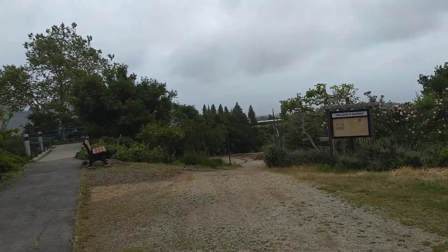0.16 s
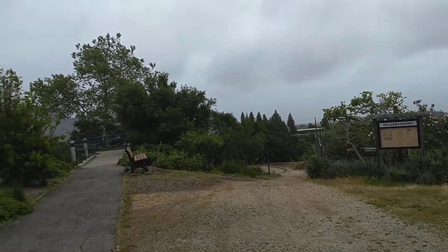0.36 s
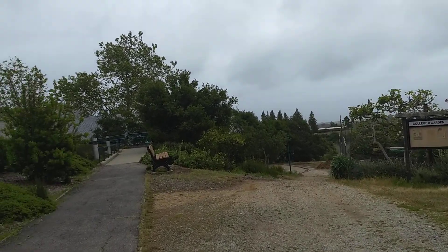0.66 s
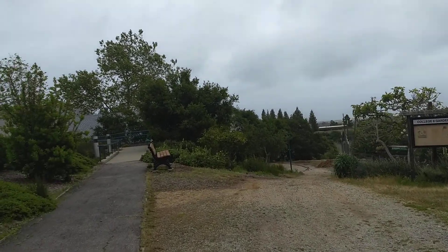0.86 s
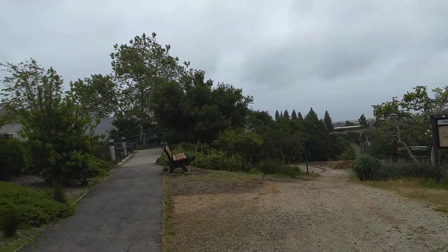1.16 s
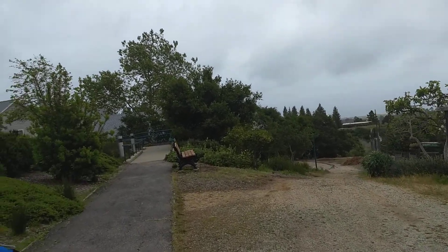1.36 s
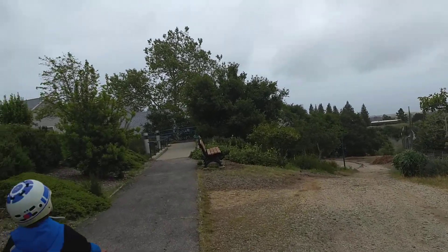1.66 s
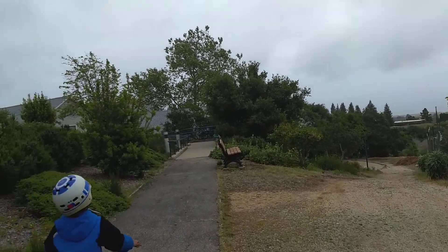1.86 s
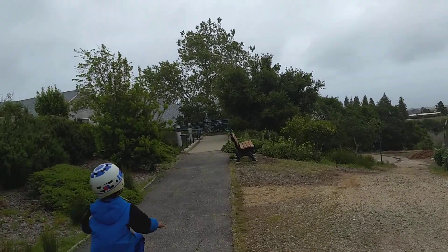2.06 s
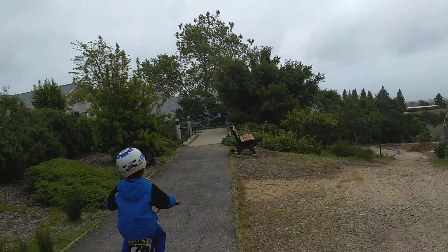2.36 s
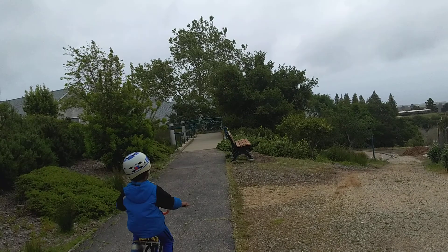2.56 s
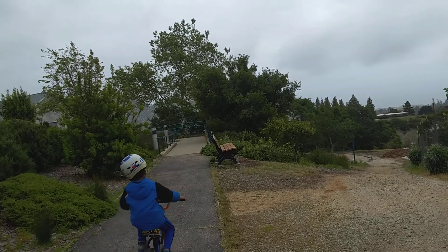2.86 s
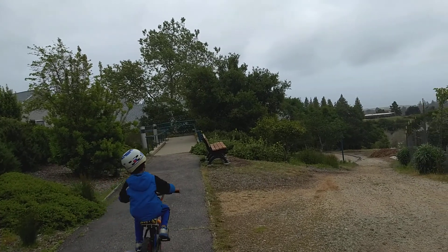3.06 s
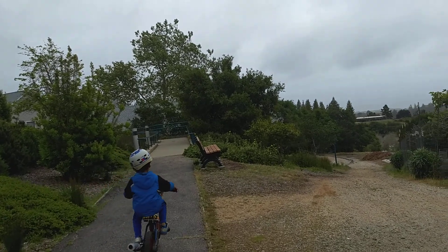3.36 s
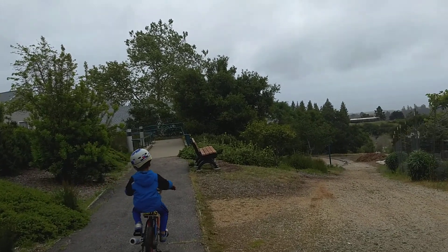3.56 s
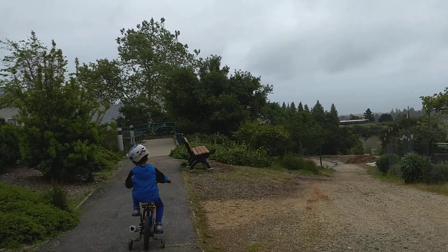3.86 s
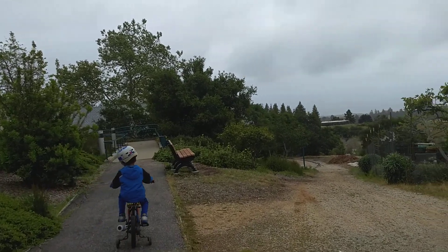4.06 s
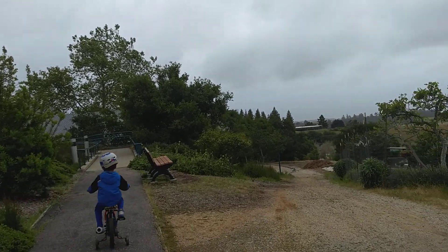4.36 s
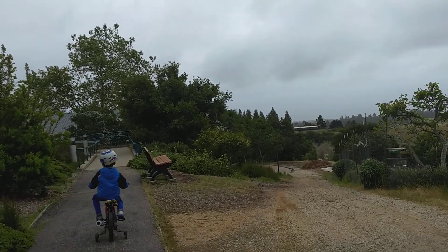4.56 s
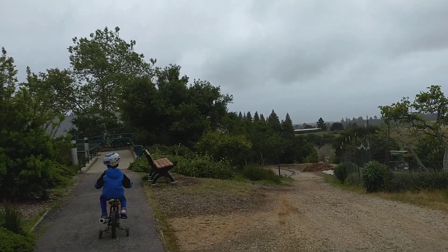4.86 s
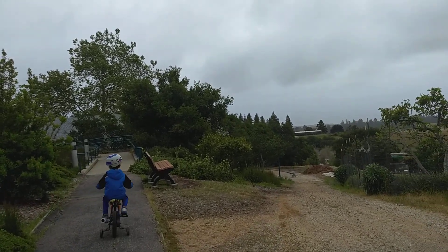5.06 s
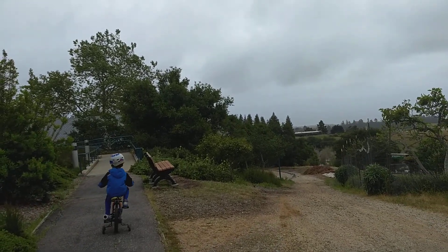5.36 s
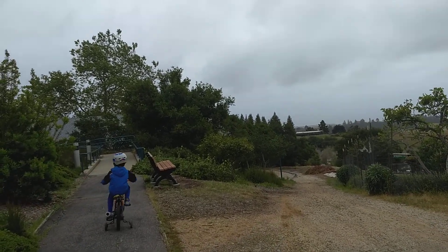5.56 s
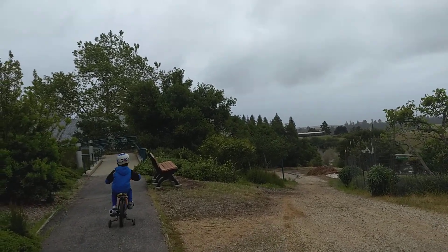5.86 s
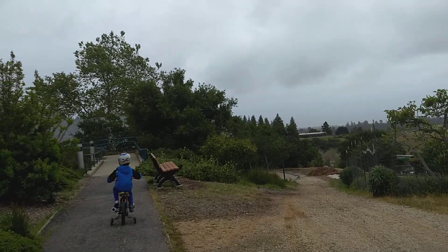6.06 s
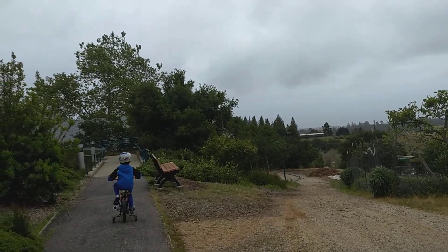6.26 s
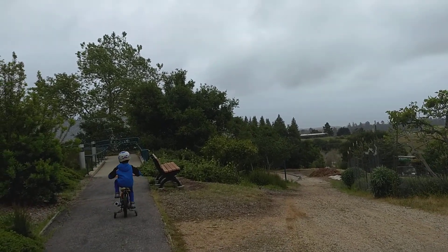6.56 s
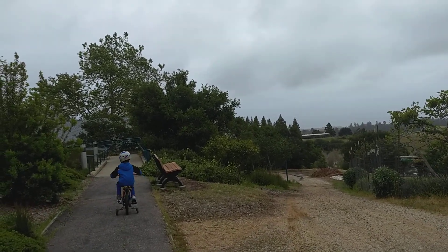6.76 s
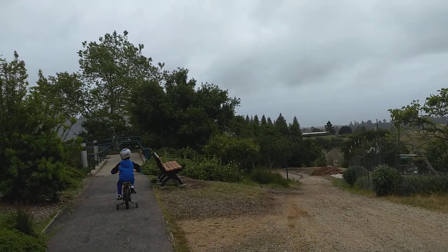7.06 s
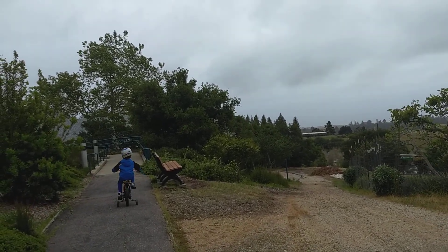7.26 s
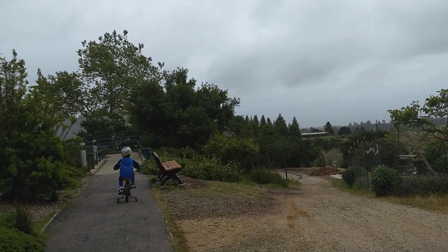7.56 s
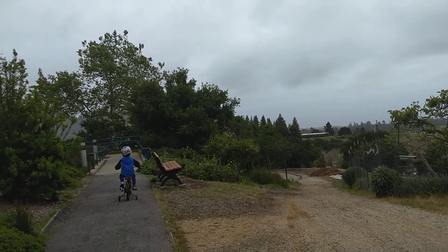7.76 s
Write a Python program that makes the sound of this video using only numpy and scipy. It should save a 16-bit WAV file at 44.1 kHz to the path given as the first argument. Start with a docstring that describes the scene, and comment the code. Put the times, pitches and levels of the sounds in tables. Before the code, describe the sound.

Hard plastic wheels rumble and scrape on gritty pavement beside the listener, chain clicking irregularly, fading forward while wind thumps the microphones.

```python
"""A child's bicycle with training wheels rolls along gritty asphalt, level with the microphones, then away ahead.
Its hard wheels roar, crunch and scuff: shaped noise whose power follows random grains of grit.
Freewheel, chain and frame tick and rattle in short noise bursts; knocks ring the hollow training wheels.
Wind buffets the two close microphones as gusty filtered noise.
Behind lies open air: soft noise, a faint drone and a far two-tone hum."""
import sys
import numpy as np
from scipy import signal
from scipy.fft import rfft, irfft, next_fast_len
from scipy.io import wavfile
from scipy.ndimage import uniform_filter1d

SR = 44100
rng = np.random.default_rng(int(sys.argv[2]) if len(sys.argv) > 2 else 0)


def wav_record(signal):
    """Record a signal, one row per channel, as 16-bit PCM in the file named by sys.argv[1]."""
    frames = np.transpose(np.atleast_2d(signal))
    bounded = np.clip(frames, -1, 1)
    # unit amplitude maps onto the largest positive 16-bit level
    quanta = np.round(bounded * 32767).astype(np.int16)
    wavfile.write(sys.argv[1], SR, quanta)


N = 348390
TIME = np.arange(N) / SR
SIZE = next_fast_len(N + 8192)  # room for filter tails
FREQS = np.maximum(np.arange(SIZE // 2 + 1) * SR / SIZE, 1)


def from_db(db):
    """Decibels to gain."""
    return 10 ** (np.asarray(db) / 20)


def rms_one(x):
    """Scale to unit rms."""
    return x / np.sqrt(np.mean(x ** 2) + 1e-20)


def in_time(rows):
    """The columns of a curve at every sample."""
    s, *columns = np.transpose(rows)
    return [np.interp(TIME, s, c) for c in columns]


def in_freq(rows):
    """The columns of a spectrum at every frequency, interpolated over log frequency."""
    hz, *columns = np.transpose(rows)
    return [np.interp(np.log(FREQS), np.log(hz), c) for c in columns]


def coloured(x, spectrum):
    """Give a white signal a spectrum and keep its power; minimum phase, so nothing sounds early."""
    gain = rms_one(from_db(in_freq(spectrum)[0]))
    cepstrum = irfft(np.log(gain), SIZE)
    cepstrum[1:SIZE // 2] *= 2
    cepstrum[SIZE // 2 + 1:] = 0
    response = np.exp(rfft(cepstrum))
    return irfft(rfft(x, SIZE) * response, SIZE)[..., :N]


def noise():
    """White noise."""
    return rng.standard_normal(N)


def two_paths():
    """Unrelated white noise for the direct and the scattered path."""
    return rng.standard_normal((2, N))


def drift(rate):
    """Slow chance with about this many turns a second; unit rms."""
    size = SIZE // 16  # a coarse time grid is enough
    hz = np.arange(size // 2 + 1) * SR / SIZE
    slow = irfft(rfft(rng.standard_normal(size)) / (1 + (hz / rate) ** 2), size)
    return rms_one(np.interp(TIME, np.arange(size) / size * SIZE / SR, slow))


def evened(x, seconds):
    """Unit level over stretches of this length; faster detail stays."""
    power = uniform_filter1d(x ** 2, max(int(seconds * SR), 2))
    return x / np.sqrt(np.abs(power) + 1e-12)


def resonance(curve, width_hz):
    """A randomly driven resonance that follows a curve of level and pitch."""
    level_db, hz = in_time(curve)
    phase = 2 * np.pi * np.cumsum(hz) / SR
    ring = drift(width_hz) * np.cos(phase) + drift(width_hz) * np.sin(phase)
    return from_db(level_db) * rms_one(ring)


def grains(per_s, spread_db, t60):
    """Power of small random contacts: uneven sizes, sudden starts, quick decays; mean near 1."""
    happens = rng.random(N) < per_s / SR
    sizes = from_db(spread_db * np.minimum(rng.exponential(1, N), 3)) * happens
    power = signal.lfilter([1], [1, -from_db(-120 / (t60 * SR))], sizes ** 2 + 1e-9)
    return evened(np.sqrt(power), seconds=0.097) ** 2


# open-air noise around the microphones: (frequency [Hz], relative level [dB per Hz])
AIR_SPECTRUM = [(30, -1), (80, 11), (250, 19.5), (480, -4), (650, -4), (850, -12), (1000, 12.5), (1200, 7),
                (1900, -6), (2450, -8), (3050, 8), (3600, 4.5), (6000, -55), (9000, -12), (16000, -18)]
# soft drone: (time [s], level [dB], pitch [Hz])
DRONE = [(0, -45.5, 410), (1, -43, 417.5), (2.5, -58, 417.4), (4.1, -46, 416.2), (4.7, -51.5, 424.3),
         (5.5, -54, 408.6), (7.9, -46, 410)]
# far hum: (time [s], level [dB])
HUM = [(0, -44.5), (2.7, -59), (4.3, -49.5), (5.1, -44.5), (6.6, -46.5), (7.9, -44.5)]
# its two narrow tones: (mean frequency [Hz], relative level [dB])
HUM_TONES = [(342, -2.5), (361, -.5)]


def background():
    """Open air as shaped noise, a drone as a driven resonance, a far hum as two wavering sines."""
    hum = 0
    for hz, level_db in HUM_TONES:
        phase = 2 * np.pi * np.cumsum(hz + .8 * drift(9)) / SR
        tone = np.sin(phase) * from_db(0.41 * drift(2.8))
        hum = hum + from_db(level_db) * rms_one(tone)
    air = from_db(-48.5) * coloured(noise(), AIR_SPECTRUM)
    return air + resonance(DRONE, width_hz=14.0) + from_db(in_time(HUM)[0]) * hum


# breeze on the microphones, before its lumps: (time [s], relative level [dB])
BREEZE = [(0, -23.5), (.25, -33.5), (.33, -27), (.6, -23.5), (1.03, -30), (1.15, -40), (1.42, -40.5),
          (1.55, -32), (1.65, -32.5), (1.9, -30), (2.0, -26.5), (2.4, -27.5), (2.7, -30.5), (3.15, -27),
          (3.25, -51), (3.42, -32.5), (3.55, -44), (3.6, -25), (3.75, -41), (3.94, -29), (4.14, -36),
          (4.3, -32), (4.5, -29), (4.7, -40), (5.05, -33.5), (5.3, -34), (5.45, -28), (5.66, -41),
          (5.9, -23), (6.08, -27.5), (6.2, -24), (6.5, -20.5), (6.92, -20), (7.05, -32), (7.45, -34.5),
          (7.66, -26.5), (7.9, -30)]
# single gusts that hit the microphones: (time [s], relative level [dB], half length [s])
PUFFS = [(0.052, -14.5, 0.0037), (0.146, -27, 0.024), (0.52, -13, 0.036), (0.648, -11.5, 0.01),
         (0.739, -13.5, 0.038), (0.887, -14, 0.01), (1.029, -14, 0.0061), (1.515, -22, 0.026),
         (1.841, -22.5, 0.013), (2.176, -10.5, 0.022), (2.264, -11, 0.038), (2.475, -17.5, 0.0042),
         (2.508, -14.5, 0.0064), (2.58, -15, 0.0084), (2.773, -23, 0.015), (2.907, -23, 0.03),
         (2.953, -20.5, 0.0097), (3.047, -21, 0.013), (3.086, -16, 0.0084), (3.144, -17.5, 0.03),
         (3.703, -21.5, 0.025), (3.795, -23.5, 0.013), (3.834, -23.5, 0.025), (3.986, -11.5, 0.018),
         (4.035, -17, 0.03), (4.324, -12.5, 0.0081), (4.443, -19.5, 0.027), (4.495, -19, 0.017),
         (4.544, -23, 0.013), (4.793, -21.5, 0.019), (4.91, -27, 0.0087), (5.09, -26, 0.016),
         (5.297, -24.5, 0.022), (5.344, -25.5, 0.02), (5.538, -15, 0.024), (5.588, -19.5, 0.015),
         (5.718, -14.5, 0.01), (5.753, -20, 0.018), (5.802, -14, 0.0052), (5.999, -22, 0.0062),
         (6.136, -13.5, 0.011), (6.285, -21.5, 0.014), (6.334, -14.5, 0.0099), (6.379, -17.5, 0.0079),
         (6.476, -18, 0.062), (6.562, -19.5, 0.026), (6.719, -13, 0.014), (6.767, -21, 0.0081),
         (6.849, -12.5, 0.01), (6.905, -18, 0.025), (7.12, -24, 0.0093), (7.277, -16, 0.014),
         (7.527, -23, 0.015), (7.697, -24, 0.01), (7.761, -17.5, 0.0079), (7.81, -15.5, 0.014),
         (7.862, -17, 0.026)]
# size of the eddies: (time [s], base weight of quick buffeting against slow rumble [dB])
EDDIES = [(0, 7.5), (.6, -0.5), (1.9, 4), (2.2, 7.5), (2.6, 7), (3.6, -6), (4.3, 1), (5.3, -7.5),
          (6.2, -4.5), (6.5, 1.5), (7.9, 3)]
# slow, quick and quickest turbulence: (frequency [Hz], relative level [dB per Hz])
RUMBLE_SPECTRUM = [(12, -59), (30, -15), (43, -11.5), (65, 4), (100, 3), (150, -2.5), (220, -20),
                   (320, -24), (600, -58.5), (4000, -100)]
BUFFET_SPECTRUM = [(30, -58), (90, -5), (150, 5), (220, -1.5), (300, -11), (500, -23), (800, -42),
                   (2000, -47), (8000, -73)]
FLUTTER_SPECTRUM = [(50, -9), (200, -0.5), (350, -7.5), (550, -17.5), (800, -33.5), (3000, -62)]


def wind(lumpy_db, rumble_db, buffet_db, flutter_db, steepness):
    """Turbulence at the ports; stronger gusts shed smaller eddies: rumble, then buffeting, then flutter."""
    lumps = rms_one(from_db(lumpy_db * drift(30)))
    power = from_db(in_time(BREEZE)[0]) ** 2 * lumps ** 2
    for s, level_db, half_s in PUFFS:
        near = slice(max(int((s - .2) * SR), 0), int((s + .2) * SR))
        power[near] += from_db(level_db) ** 2 * np.exp(-((TIME[near] - s) / half_s) ** 4)
    force = np.sqrt(power)
    # weights against the rumble
    quick = from_db(in_time(EDDIES)[0]) * (force / 0.21) ** steepness
    quickest = from_db(flutter_db) * quick ** 3
    rumble = from_db(rumble_db) * evened(coloured(noise(), RUMBLE_SPECTRUM), seconds=0.035)
    buffet = from_db(buffet_db) * evened(coloured(noise(), BUFFET_SPECTRUM), seconds=0.0312)
    flutter = evened(coloured(noise(), FLUTTER_SPECTRUM), seconds=0.021)
    mixture = rumble + quick * buffet + quickest * flutter
    pressure = force * mixture / np.sqrt(1 + quick ** 2 + quickest ** 2)
    return signal.sosfilt(signal.butter(2, 34, "high", fs=SR, output="sos"), pressure)


def pair(table):
    """Left and right response of the two microphones: a level balance and a phase lead."""
    balance_db, lead = in_freq(table)
    gains = from_db(np.array([balance_db, -balance_db]) / 2)
    gains = gains / np.sqrt(np.mean(gains ** 2, axis=0))
    return gains * np.exp(.5j * np.array([lead, -lead]))


# wind at the pair: (frequency [Hz], left-right balance [dB], left's phase lead [rad])
WIND_PAIR = [(30, -0.57, 2.95), (97, -1.78, 2.875), (213, -1.4, 2.535), (327, -0.64, 1.96), (1020, 1, 1.6)]


def wind_on_pair():
    """Gusts overload the close microphones softly; a little turbulence strikes both in step."""
    gusts = wind(lumpy_db=3.5, rumble_db=1.5, buffet_db=-0.94, flutter_db=-21.5, steepness=0.79)
    gusts = gusts * rms_one(from_db(1.0 * drift(31)))
    gusts = .65 * np.tanh(gusts / .65)
    common = wind(lumpy_db=5.5, rumble_db=-0.5, buffet_db=-1, flutter_db=-14, steepness=0.49)
    return from_db(-21.5) * common + irfft(rfft(gusts, SIZE) * pair(WIND_PAIR), SIZE)[:, :N]


# share of the sound scattered by ground and bushes: (frequency [Hz], share [0-1])
SCATTER = [(250, 0.41), (500, 0.41), (800, 0.1), (1150, 0.01), (1850, 0.22), (2130, 0.01), (2500, 0),
           (3400, 0.89), (4000, 0.21), (4600, 0.06), (5300, 0.44), (6000, 0.03), (7000, 0.28), (9000, 0.13),
           (16000, 0)]


def heard(direct, scattered, table, colour=1):
    """Direct sound enters both channels alike, scattered sound in opposite polarity, then the pair's response."""
    share = np.clip(in_freq(SCATTER)[0], 0, 1) / 2
    both = np.sqrt(1 - share) * rfft(direct, SIZE) + np.sqrt(share) * rfft(scattered, SIZE) * [[1], [-1]]
    return irfft(both * pair(table) * colour, SIZE)[:, :N]


# when the bicycle draws level, how far to the side of the microphones, how fast
PASS_S, PASS_M, SPEED_M_PER_S = 0.63, 0.94, 1.57


def ahead_m():
    """How far the bicycle has rolled past the microphones; negative before it draws level."""
    return SPEED_M_PER_S * (TIME - PASS_S)


def dulled(x, db_per_m, corner_hz):
    """The top of the treble weakens with the bicycle's distance."""
    treble = irfft(rfft(x, SIZE) / (1 + (corner_hz / FREQS) ** 10), SIZE)[..., :N]
    return x - treble * (1 - from_db(-db_per_m * np.hypot(ahead_m(), PASS_M)))


# microphone pair, ahead and beside: (frequency [Hz], left-right balance [dB], left's phase lead [rad])
AHEAD = [(250, -1, 2.3), (420, 2, 1.5), (620, 3.2, .1), (900, 2.4, 0), (1250, -2, .1), (1600, -5, .7),
         (1880, -6, 1.9), (2150, -.8, 3.08), (2480, .1, 3.14), (2750, 3, 3.1), (3080, 8, 3.1),
         (3450, 0, 2.2), (4000, .7, 3.14), (4500, -.5, 3.14), (4900, -2, 3.3), (5350, -7, 5),
         (5800, -2, 6.2), (6500, 1, 7), (7400, -1, 11.8), (8500, 1, 13.8), (10000, 3, 17.9),
         (13000, 3, 25.7), (16000, 5, 33.3)]
BESIDE = [(250, -1, 2.3), (600, 3, -.3), (900, 2.5, -.2), (1250, -2, .4), (1550, -6, 1.7), (1900, -2, 3),
          (2100, -.1, 3.14), (2450, -.5, 3.14), (2950, -10, 2), (3300, -2, -.3), (4000, 0, 0),
          (4500, -1, 3), (5100, 2, 3.6), (5600, -1, 6.5), (6300, -4, 7.2), (7400, -2, 11.6),
          (10000, 2, 17.9), (16000, 4, 33.3)]
# extra colour of sound from beside: (frequency [Hz], gain [dB])
BESIDE_COLOUR = [(600, -4), (950, 3.5), (1350, -8), (2100, -2.5), (2800, 5.5), (3100, -0.5), (3550, 11),
                 (4200, -1.5), (5000, -4), (6000, -8), (7000, -3.5), (16000, -13)]


def passing(bike):
    """The sound turns from beside to ahead as the bicycle rolls past the pair."""
    angle = np.arctan2(np.maximum(ahead_m(), 0), PASS_M)
    ahead = heard(*(bike * np.sin(angle) ** 2), AHEAD)
    colour = from_db(in_freq(BESIDE_COLOUR)[0])
    return ahead + heard(*(bike * np.cos(angle) ** 2), BESIDE, colour)


def small_ticks():
    """Lesser contacts come at random and follow the rolling levels; rows like those of TICKS."""
    per_s, t60_s = 45, 0.011
    over_rolling_db = (-5.5, -0.5, -2.5)  # knock, clack, tick over roar, crunch, fizz
    spread_db = (7.5, 5, 6)
    levels_db = np.array(in_time(ROLL))
    draws = rng.random((700, 4))
    times = np.cumsum(-np.log(1 - draws[:, 0])) / per_s
    scatter_db = np.sqrt(3) * (2 * draws[:, 1:] - 1) * spread_db
    return [(s, *(levels_db[:, int(s * SR)] + over_rolling_db + own_db), t60_s)
            for s, own_db in zip(times, scatter_db) if s < TIME[-1]]


# loudest ticks and knocks of freewheel, frame and pebbles, before the part trims:
# (time [s], knock level [dB], clack level [dB], tick level [dB], base decay t60 [s])
TICKS = [(.0611, -24.5, -19, -54, 0.027), (.08, -27, -25, -50, 0.029), (.107, -20, -23.5, -38, 0.014),
         (.111, -47, -27, -20, .01), (.1235, -13.5, -27, -51, 0.016), (.1397, -53, -27, -20, .025),
         (.155, -51, -29, -25, .02), (.169, -24, -22.5, -42, 0.022), (.218, -50, -26, -27, 0.014),
         (.234, -28.5, -29, -50, 0.031), (.248, -26, -38, -50, .015), (.3144, -35, -23.5, -20, 0.057),
         (.3963, -51, -22, -18, 0.023), (.4447, -49, -19.5, -14, 0.026), (.4713, -25, -19.5, -45, 0.021),
         (.509, -24.5, -25, -23, 0.018), (.5343, -27, -27.5, -22, .015), (.5427, -43, -26, -20.5, 0.032),
         (.5636, -45, -25, -29, 0.02), (.5962, -29, -24, -46, 0.02), (.6254, -32, -23, -39, 0.033),
         (.634, -23, -32, -24, 0.046), (.6454, -30, -23.5, -33, 0.019), (.6782, -53, -22.5, -23.5, 0.14),
         (.759, -25.5, -21.5, -27, 0.029), (.8059, -29, -17, -19, 0.021), (.832, -26, -23.5, -38, 0.019),
         (.9007, -24, -20, -43, 0.022), (.9202, -31, -26, -45, 0.013), (1.0253, -20, -13, -42, 0.008),
         (1.0979, -26, -22.5, -48, 0.016), (1.113, -31, -28, -22.5, .029), (1.1872, -50, -26, -25, 0.011),
         (1.284, -36, -19.5, -29, 0.036), (1.3405, -38, -25, -50, .015), (1.35, -30, -23.5, -36, .016),
         (1.4667, -48, -34, -32, 0.011), (1.5228, -42, -31, -29, 0.013), (1.594, -29.5, -18, -36, .012),
         (1.62, -32, -24, -31, .035), (1.635, -21.5, -21, -25, 0.027), (1.653, -44, -20, -25, 0.019),
         (1.7314, -26.5, -21, -22.5, 0.026), (1.782, -32, -26, -33, 0.023),
         (1.8555, -23.5, -22.5, -35, 0.023), (1.9003, -39, -22.5, -21, 0.047),
         (1.978, -35, -20.5, -24, 0.014), (2.3196, -54, -23, -34, .02), (2.3562, -32, -19.5, -24, .016),
         (2.4044, -28.5, -30, -48, 0.021), (2.418, -34, -24.5, -43, .018), (2.435, -29, -23, -46, 0.012),
         (2.5133, -32, -26.5, -24.5, .018), (2.6018, -40, -31, -32, .013), (2.7165, -48, -33, -36, 0.012),
         (2.7357, -50, -31, -43, .012), (2.8806, -34, -27, -39, 0.03), (2.9367, -46, -28, -29, 0.016),
         (2.9618, -39, -29, -33, 0.01), (3.0322, -39, -20, -23, .0097), (3.0551, -34, -23, -45, .02),
         (3.2238, -46, -28, -27, 0.018), (3.2662, -40, -26.5, -27, 0.034), (3.2797, -46, -27, -27, 0.017),
         (3.3349, -49, -39, -30, .014), (3.3662, -53, -29, -32, .012), (3.4429, -27.5, -30, -34, .021),
         (3.4677, -34, -23.5, -41, 0.024), (3.5005, -44, -26, -30, 0.023), (3.5155, -37, -25, -24, .014),
         (3.6713, -46, -34, -28, .014), (3.905, -38, -24.5, -28, 0.019), (3.914, -40, -27, -33, .017),
         (3.98, -32, -32, -39, 0.018), (4.1316, -43, -30, -31, 0.012), (4.2326, -52, -29.5, -26, 0.042),
         (4.2948, -55, -27.5, -25, 0.021), (4.301, -62, -26, -30, .017), (4.4741, -57, -32, -32, 0.014),
         (4.5228, -48, -30, -32, 0.021), (4.5752, -27.5, -47, -60, 0.045), (4.5973, -30, -43, -60, .014),
         (4.604, -34, -37, -60, 0.041), (4.747, -34, -32, -46, .072), (4.7985, -50, -36, -30, .014),
         (4.837, -53, -32, -33, .015), (4.88, -50, -30, -47, .015), (4.9791, -55, -28.5, -30, 0.016),
         (5.0252, -58, -32, -33, .015), (5.1898, -59, -30, -32, 0.013), (5.2799, -45, -30, -34, 0.038),
         (5.393, -54, -35, -35, .023), (5.4223, -55, -35, -31, 0.017), (5.5694, -55, -35, -35, 0.029),
         (5.6306, -59, -33, -30, 0.01), (5.636, -58, -31, -38, .01), (5.8184, -55, -37, -29, 0.011),
         (5.8433, -53, -46, -39, 0.018), (5.8544, -55, -34, -32, .012), (5.9532, -55, -35, -33, 0.015),
         (6.0184, -57, -29.5, -37, 0.015), (6.0524, -56, -32.5, -27, 0.017),
         (6.2186, -46, -23, -17.5, 0.0062), (6.463, -47, -51, -56, 0.023), (6.478, -29, -32, -52, 0.022),
         (6.551, -57, -34, -46, .013), (6.7556, -51, -29, -27, .023), (6.7713, -56, -25, -40, .014),
         (6.8683, -50, -34, -28, 0.011), (6.8773, -61, -34, -22, .012), (6.9583, -48, -37, -31, 0.014),
         (7.0275, -57, -30, -37, .013), (7.05, -61, -26, -23, 0.018), (7.0835, -56, -32, -28, 0.022),
         (7.0978, -55, -36, -33, .012), (7.1135, -57, -29, -32, .012), (7.1298, -55, -29, -25, .011),
         (7.3768, -45, -31, -36, .013), (7.4306, -40, -43, -31, 0.014), (7.5325, -33, -33, -50, 0.089),
         (7.6805, -55, -32, -30, 0.014), (7.7461, -55, -32, -36, 0.014), (7.8109, -59.5, -36, -34, 0.015),
         (7.8235, -57, -28.5, -29, 0.015)]
# low, middle and high part of a contact: (frequency [Hz], relative level [dB per Hz])
KNOCK_SPECTRUM = [(150, -30), (350, 0), (900, -0.5), (1500, -4.5), (2000, -17), (2800, -18)]
CLACK_SPECTRUM = [(1400, -56), (1950, -8.5), (2330, 3), (2650, -4.5), (3080, 4.5), (3600, -6.5), (4200, 1),
                  (4900, 3.5), (5900, 5), (6600, -1), (7200, -12), (8500, -33)]  # also colours the crunch of the grit
TICK_SPECTRUM = [(5800, -19), (7000, -4), (7900, -0.5), (9000, -2), (10000, -4), (11500, -1), (13500, -2.5),
                 (16000, -2)]  # also colours the fizz of the grit


def rattle(contacts, knock_db, clack_db, tick_db, knock_ring, clack_ring, tick_ring, snap, snap_t60, blow):
    """Each contact is a hard blow and a decaying chatter, with a sharp snap strongest in the treble."""
    out = 0
    age = np.arange(SR // 10) / SR
    parts = [(KNOCK_SPECTRUM, knock_db, knock_ring),
             (CLACK_SPECTRUM, clack_db, clack_ring),
             (TICK_SPECTRUM, tick_db, tick_ring)]
    for k, (spectrum, part_db, ring) in enumerate(parts):
        bursts = np.zeros((2, N + len(age)))
        for s, *levels, t60 in contacts:
            chatter = from_db(-60 * age / max(t60 * ring, .002))
            decay = chatter + snap * (k / 2) ** 2 * from_db(-60 * age / snap_t60)
            burst = rng.standard_normal((2, len(age))) * decay
            burst[:, 0] = blow
            attack = burst[:, age < .003].std(axis=1, keepdims=True)
            start = int(s * SR)
            bursts[:, start:start + len(age)] += burst / attack * from_db(levels[k] + part_db)
        out = out + coloured(bursts[:, :N], spectrum)
    return out


# modes of a knocked training wheel: (frequency [Hz], relative level [dB], decay t60 [s])
WHEEL_MODES = [(890, -24, 0.045), (961, -8.5, 0.051), (1252, -5, 0.12), (1530, -6, 0.052)]


def wheel_knocks(ring_db, spread_db):
    """Knocks set the hollow training wheels ringing, each with its own mix of the modes."""
    s, knock_db = np.transpose(TICKS)[:2]
    own_db = spread_db * rng.standard_normal((len(s), len(WHEEL_MODES)))
    out = np.zeros(N)
    for k, (hz, level_db, t60) in enumerate(WHEEL_MODES):
        clicks = np.zeros(N) + 1e-18
        clicks[(s * SR).astype(int)] = from_db(knock_db + ring_db + level_db + own_db[:, k])
        r, w = from_db(-60 / (t60 * SR)), 2 * np.pi * hz / SR
        out += signal.lfilter([0, np.sin(w)], [1, -2 * r * np.cos(w), r * r], clicks)
    return out


# a training wheel scuffs sideways: (time [s], level [dB], half length [s])
SCUFFS = [(2.358, -20, 0.0031), (2.409, -26, 0.008), (2.433, -29, 0.0038), (2.479, -32, 0.0085),
          (2.496, -33, 0.0043), (4.591, -33, 0.0065), (4.749, -40, 0.013), (6.369, -36, 0.003),
          (6.405, -37, 0.026), (6.481, -27.5, 0.0029), (6.499, -31, 0.0026)]
# scrape of plastic on asphalt: (frequency [Hz], relative level [dB per Hz])
SCUFF_SPECTRUM = [(300, -31), (900, -3), (1600, -7.5), (2400, 13.5), (3100, 4.5), (4500, -5.5), (9000, -25)]


def scuffs():
    """Short stick-slip scrapes of hard plastic on asphalt."""
    press = sum(from_db(level_db) * np.exp(-((TIME - s) / half_s) ** 2 / 2) for s, level_db, half_s in SCUFFS)
    slips = np.sqrt(grains(per_s=630, spread_db=1.0, t60=0.026))
    return coloured(press * slips * two_paths(), SCUFF_SPECTRUM)


# a training wheel lifts and lands: (landing time [s], time in the air [s], drop of the fizz [dB])
LIFTS = [(0.32, 0.072, 7.5), (1.185, 0.085, 4), (1.345, 0.067, 7), (1.563, 0.11, 7), (1.779, 0.068, 10.5),
         (1.975, 0.059, 6.5), (2.495, 0.0045, 11), (2.72, 0.13, 6), (2.88, 0.11, 3), (3.04, 0.042, 3),
         (3.268, 0.034, 11), (3.44, 0.11, 4), (3.852, 0.085, 12), (4.509, 0.27, 11.5), (4.755, 0.18, 11),
         (4.98, 0.2, 4.5), (5.364, 0.047, 9), (5.63, 0.097, 3), (5.815, 0.093, 8), (6.2, 0.099, 1.5),
         (6.395, 0.14, 9), (6.61, 0.023, 10), (6.755, 0.067, 7), (7.04, 0.12, 3), (7.36, 0.14, 3),
         (7.81, 0.063, 3.5)]


def rocking():
    """Swing in dB: the grit falls quiet while a training wheel is in the air, and surges when it lands."""
    lift_off_s, touch_down_s, settle_s = 0.04, 0.0079, 0.072
    landing_bite = 0.62  # surge as a share of the drop
    swing_db = np.zeros(N)
    for s, air_s, drop_db in LIFTS:
        age = TIME - s
        lifted = np.clip((age + air_s) / lift_off_s + .5, 0, 1)
        landed = np.clip(age / touch_down_s + .5, 0, 1)
        surge = landed * landing_bite * np.exp(-np.maximum(age, 0) / settle_s)
        swing_db += drop_db * (surge - lifted * (1 - landed))
    return swing_db


# rolling before swing and trims:
# (time [s], wheel roar level [dB], grit crunch level [dB], fine grit fizz level [dB])
ROLL = [(0.0, -37, -37.5, -47), (0.6, -31, -34, -32.5), (1.1, -35.5, -36, -42.5), (1.45, -39, -35, -40.5),
        (1.65, -36, -33, -38), (2.25, -32, -34, -42), (2.4, -38.5, -37.5, -40.5), (2.7, -39.5, -38, -40),
        (3.1, -36.5, -34, -36), (3.35, -37.5, -37.5, -42.5), (3.7, -31.5, -29.5, -31),
        (4.0, -38.5, -39.5, -43.5), (4.28, -34, -31, -35.5), (4.45, -43.5, -43, -47), (4.8, -40, -39, -40),
        (5.2, -46, -47.5, -49.5), (5.75, -46.5, -48.5, -49.5), (5.95, -46, -46.5, -45.5),
        (6.3, -44, -48.5, -46.5), (6.85, -44.5, -43, -40.5), (7.9, -44, -44, -40.5)]


def wheel_levels(uneven_db):
    """Roar, crunch and fizz in dB as the bicycle rocks over uneven ground."""
    swing_db = rocking() + uneven_db * drift(8.7)
    follows = [0.42, 0.75, 1]  # share of the swing
    return np.array(in_time(ROLL)) + np.outer(follows, swing_db)


# wheels drumming on asphalt: (frequency [Hz], relative level [dB per Hz])
ROAR_SPECTRUM = [(120, -11.5), (280, 1.5), (560, -2), (800, -4), (1100, -7), (1450, -6.5), (1900, -10),
                 (2500, -17.5)]
# hollow ring of the plastic training wheels: (time [s], level [dB], pitch [Hz])
WHEEL_RING = [(0, -39, 1000), (.11, -38, 974), (.3, -44, 925), (.62, -44, 917), (.9, -54, 858),
              (1.8, -39.5, 780), (2.5, -48.5, 780), (4.5, -60.5, 795), (7.9, -53, 771)]


def rolling(levels_db, roar_db, crunch_db, fizz_db, rough, hiss, crunch_ticking, fizz_ticking, clump_db, jolting):
    """The wheels drum on the asphalt and crush grit that lies in patches; sparser, sharper ticks ride on top."""
    roar, crunch, fizz = from_db(levels_db)
    patches = rms_one(from_db(clump_db * drift(28))) ** 2
    grit = grains(per_s=320, spread_db=2.5, t60=0.017) * patches
    ticking = grains(per_s=75, spread_db=1.5, t60=0.0094)
    bumps = rms_one(np.sqrt(1 + rough * grit))
    crushing = rms_one(np.sqrt(grit + hiss + crunch_ticking * ticking))
    spraying = rms_one(np.sqrt(grit + fizz_ticking * ticking))
    drum = from_db(roar_db) * coloured(roar * bumps * two_paths(), ROAR_SPECTRUM)
    crack = from_db(crunch_db) * coloured(crunch * crushing * two_paths(), CLACK_SPECTRUM)
    spray = from_db(fizz_db) * coloured(fizz * spraying * two_paths(), TICK_SPECTRUM)
    jolts = rms_one(np.sqrt(bumps ** 2 + jolting * grains(per_s=44, spread_db=0.0, t60=0.022)))
    ring = np.array([resonance(WHEEL_RING, width_hz=214) for _ in range(2)])
    return drum + crack + spray + jolts * ring


def stone_colours(x, spread_db, change_hz, count):
    """Every stone and link rings at pitches of its own, so narrow treble bands flare up independently."""
    place = np.interp(np.log(FREQS), np.log([1400, 16000]), [0, count - 1])
    spectrum, out = rfft(x, SIZE), 0
    for k in range(count):
        band = irfft(spectrum * np.maximum(1 - np.abs(place - k), 0), SIZE)[..., :N]
        flare = rms_one(from_db(spread_db * drift(change_hz))) if k else 1  # lowest band, with the roar, is left alone
        out = out + band * flare
    return out


def bicycle():
    """Rolling, scuffs, rattle and wheel knocks, dulled by distance; direct and scattered path."""
    bike = rolling(wheel_levels(uneven_db=2.5), roar_db=-1.0, crunch_db=-1.5, fizz_db=0.04, rough=0.88,
                   hiss=0.42, crunch_ticking=0.4, fizz_ticking=0.8, clump_db=1.13, jolting=0.94)
    bike = stone_colours(bike + scuffs(), spread_db=4.5, change_hz=28.0, count=28)
    bike = bike + rattle(TICKS + small_ticks(), knock_db=-1.03, clack_db=-3.1, tick_db=1.23,
                         knock_ring=1.7, clack_ring=1.0, tick_ring=1.0, snap=0.64, snap_t60=0.0025, blow=2.0)
    bike[0] += wheel_knocks(ring_db=-10.5, spread_db=1.5)  # direct path only
    return dulled(bike, db_per_m=1.48, corner_hz=8800)


def scene():
    """The bicycle moves from beside to ahead, under wind and over the outdoor background."""
    outdoors = heard(background(), background(), AHEAD)
    return outdoors + wind_on_pair() + passing(bicycle())


def record(dry):
    """The top is cut steeply above 15.8 kHz."""
    return signal.sosfilt(signal.ellip(10, .2, 70, 15800, fs=SR, output="sos"), dry)


dry = scene()
out = record(dry)
wav_record(out)
```